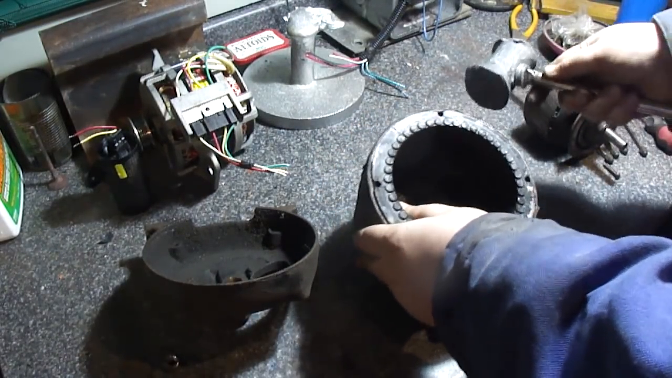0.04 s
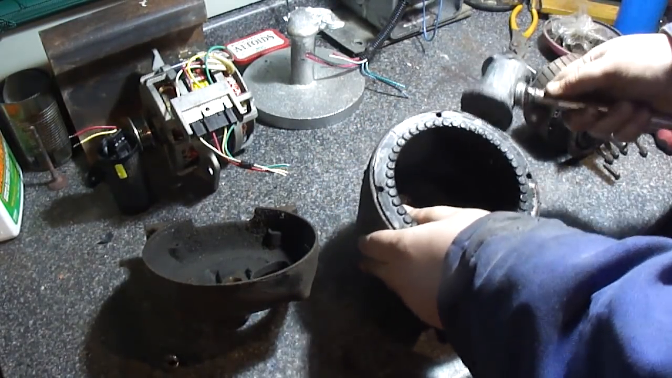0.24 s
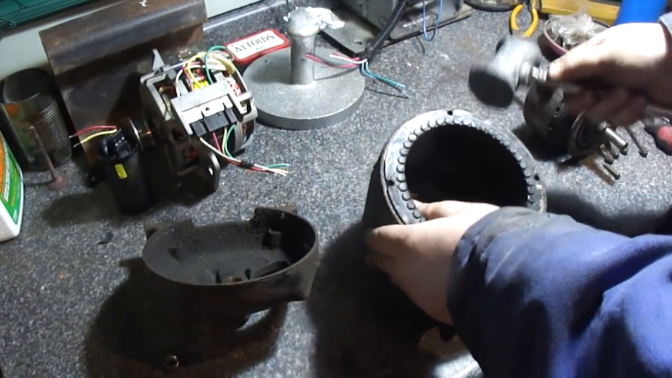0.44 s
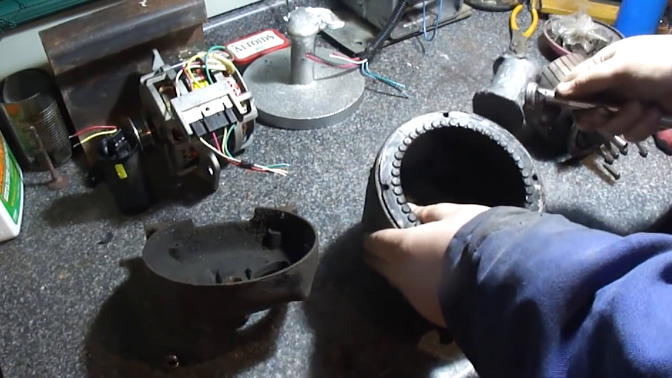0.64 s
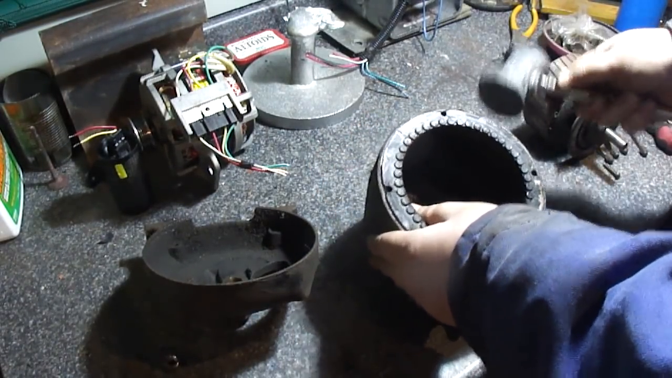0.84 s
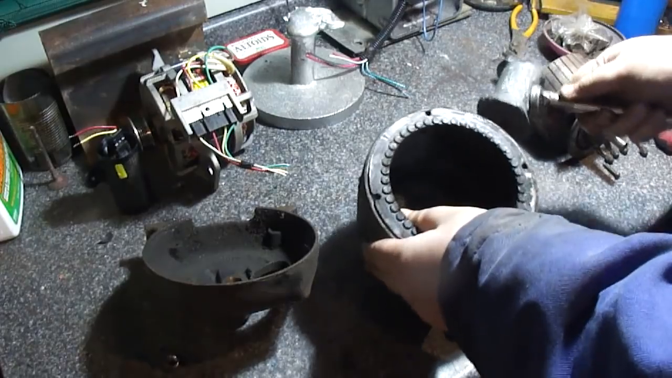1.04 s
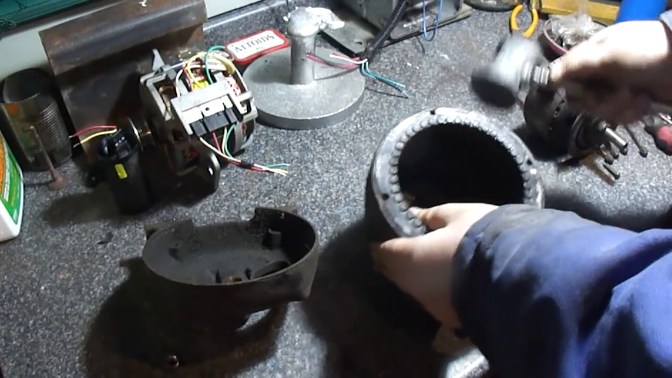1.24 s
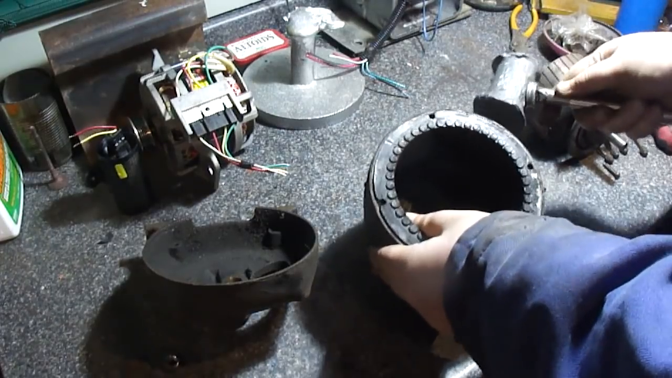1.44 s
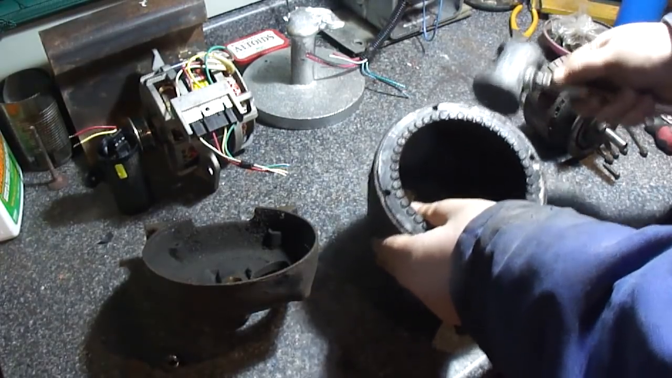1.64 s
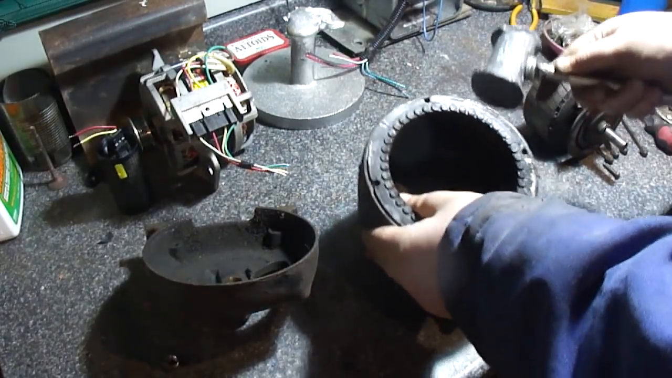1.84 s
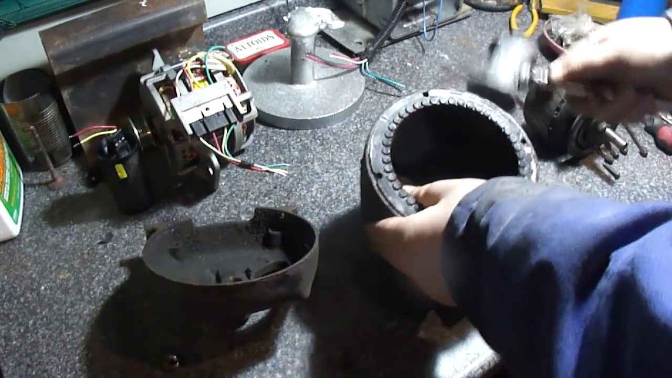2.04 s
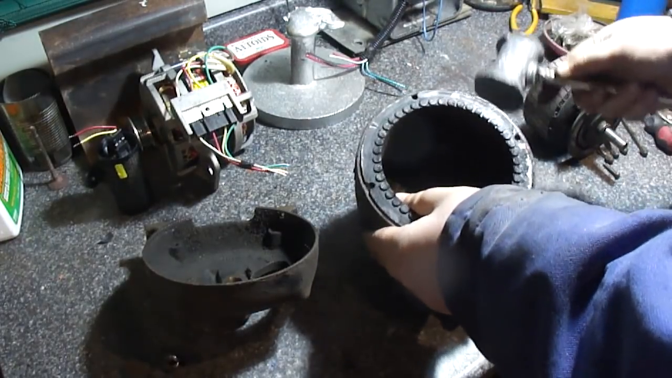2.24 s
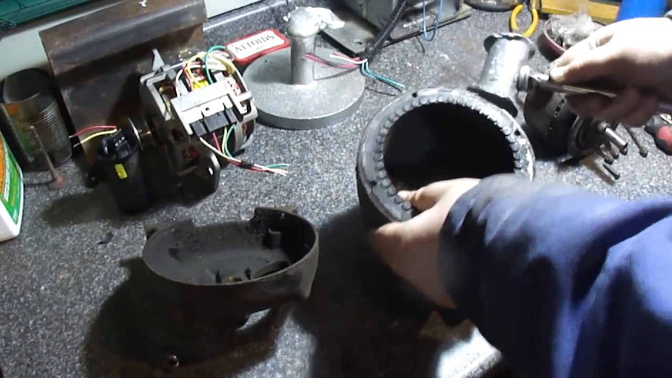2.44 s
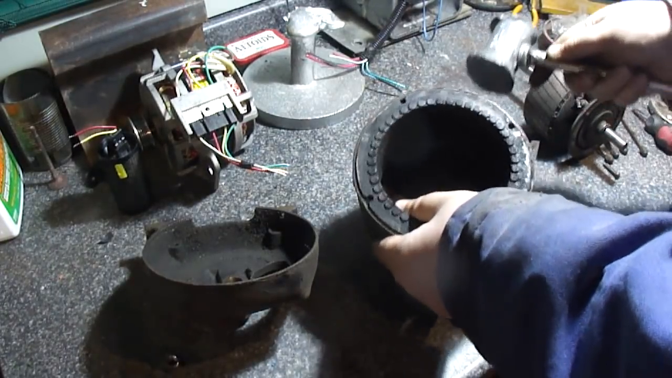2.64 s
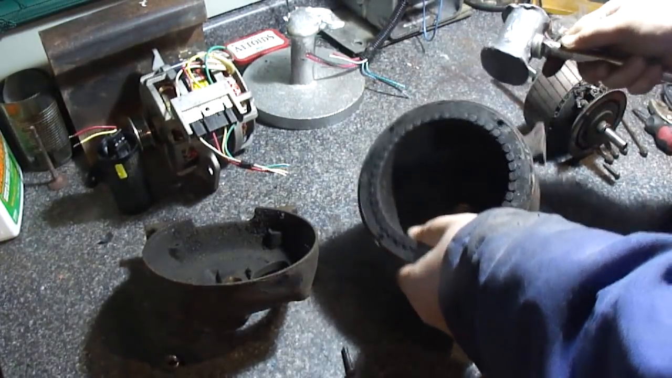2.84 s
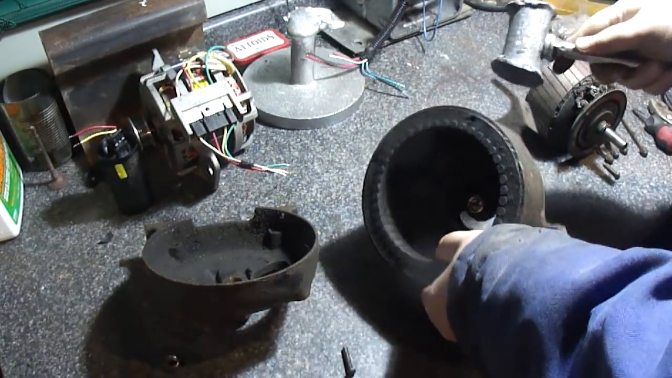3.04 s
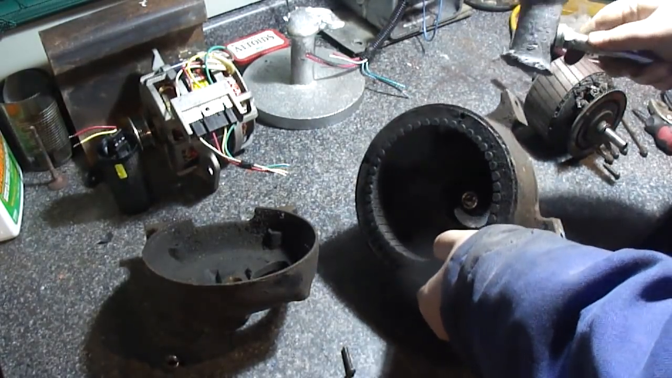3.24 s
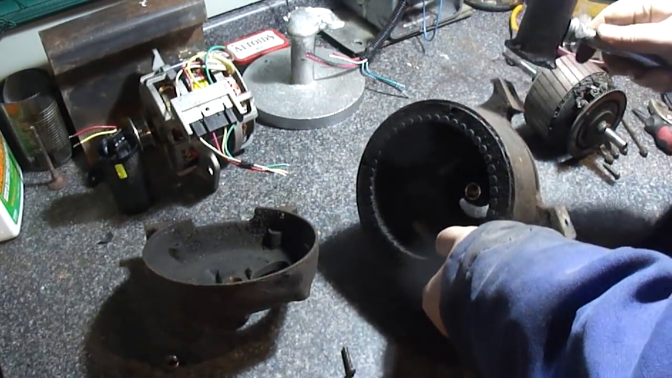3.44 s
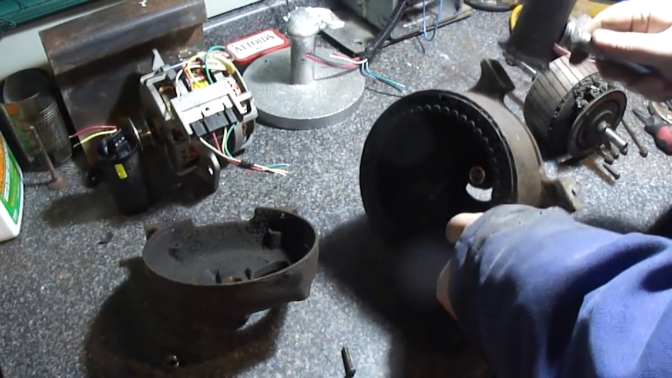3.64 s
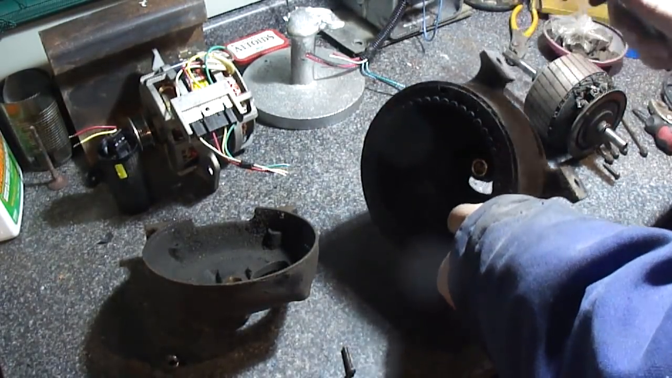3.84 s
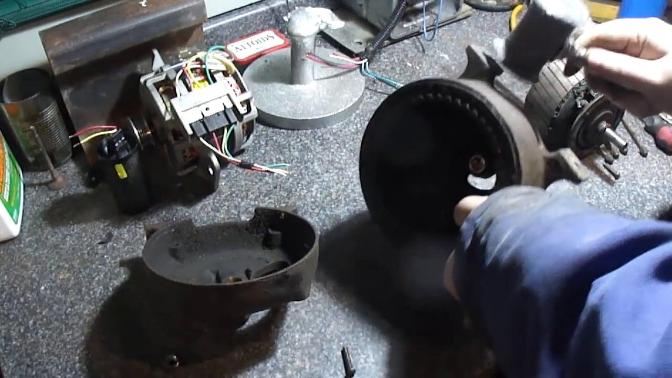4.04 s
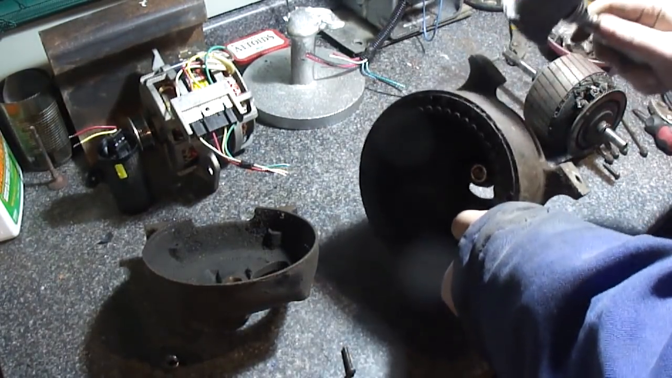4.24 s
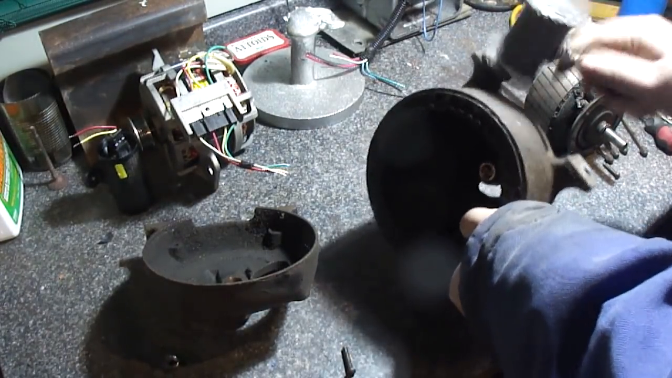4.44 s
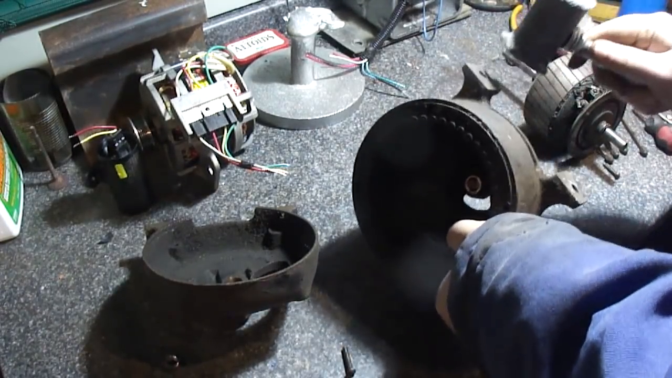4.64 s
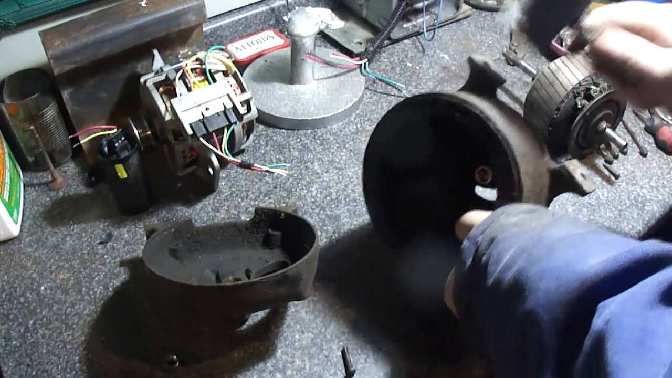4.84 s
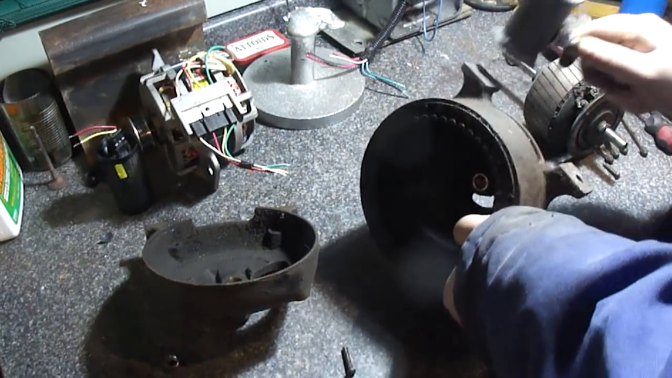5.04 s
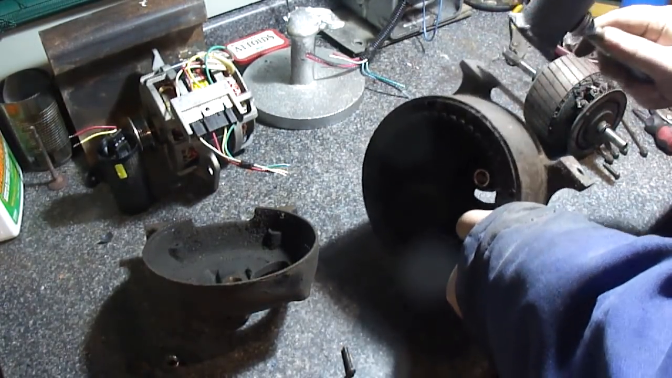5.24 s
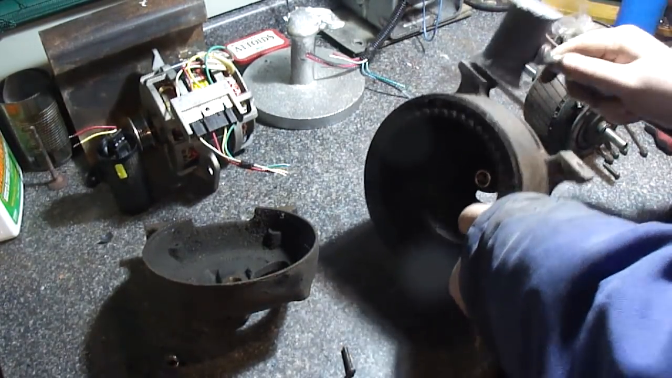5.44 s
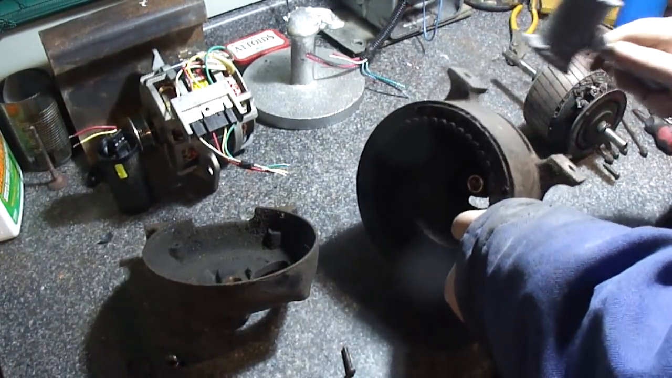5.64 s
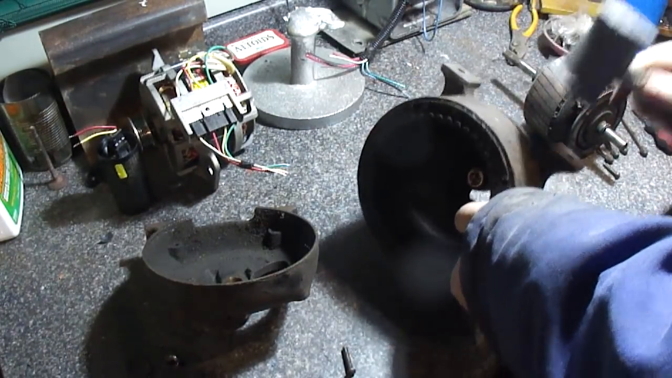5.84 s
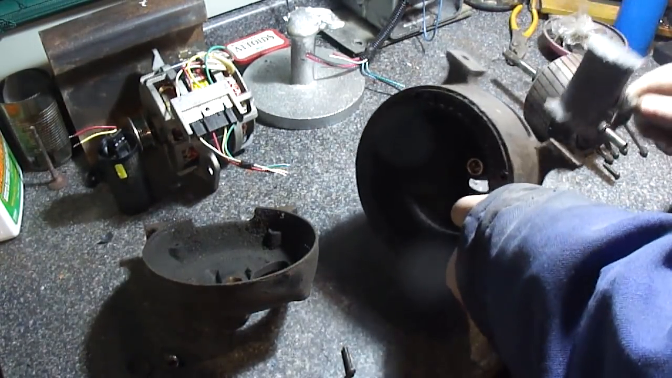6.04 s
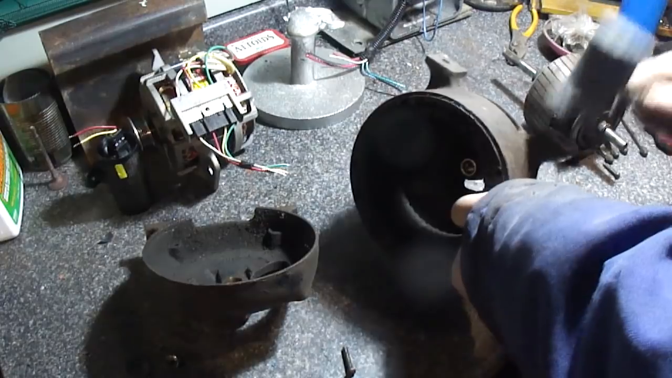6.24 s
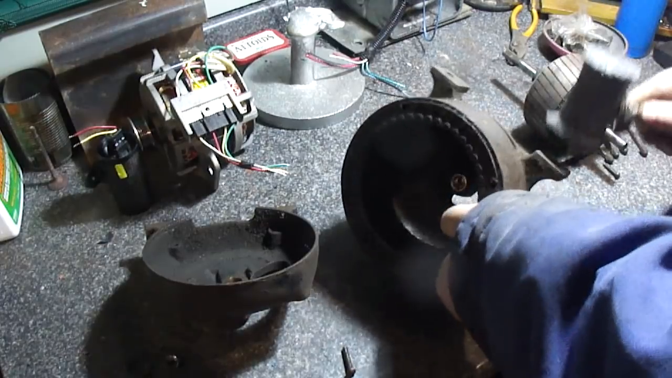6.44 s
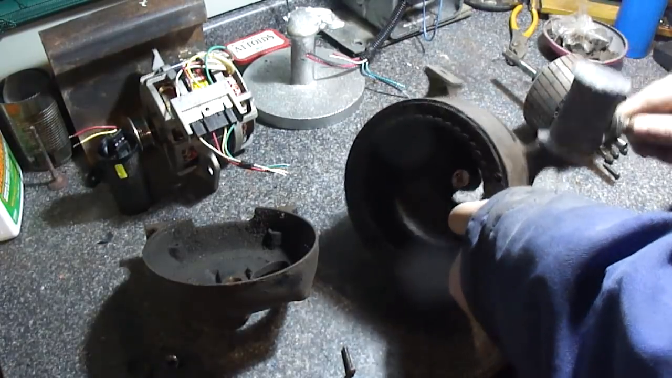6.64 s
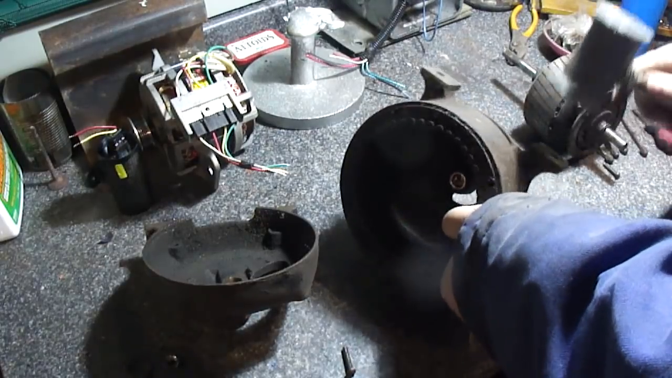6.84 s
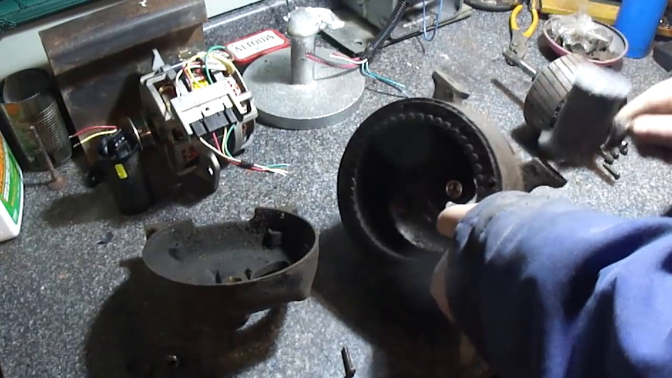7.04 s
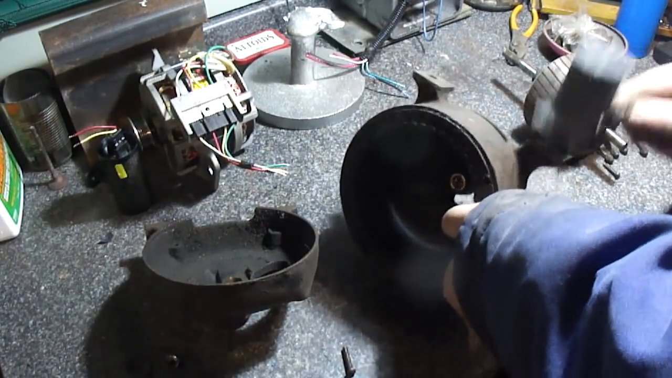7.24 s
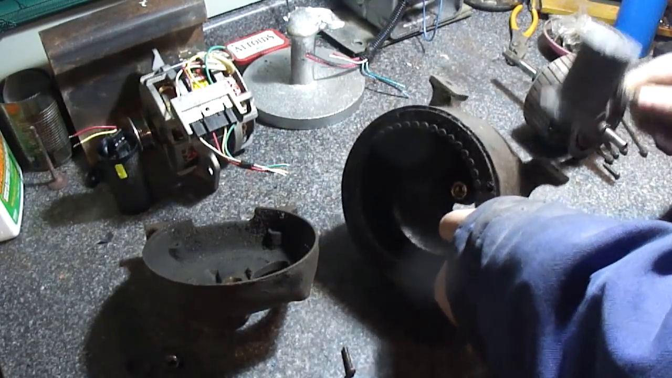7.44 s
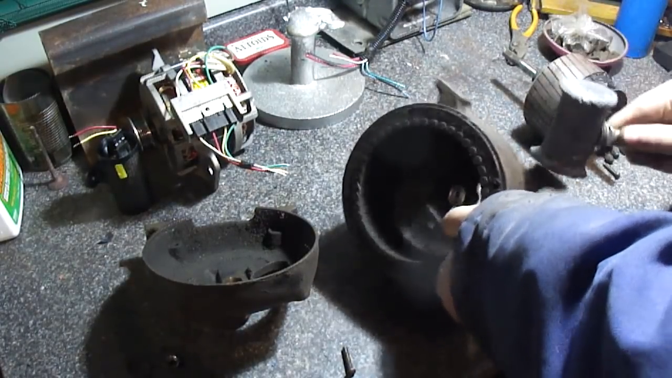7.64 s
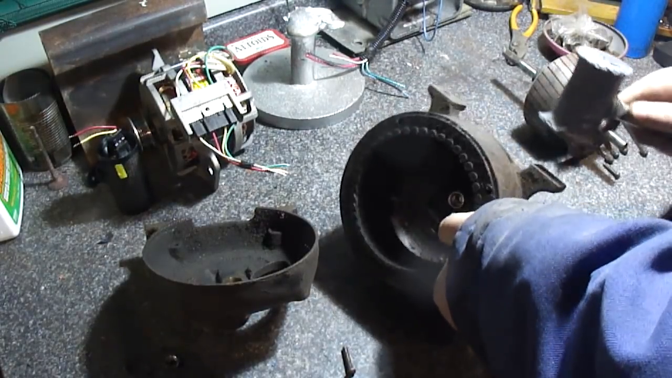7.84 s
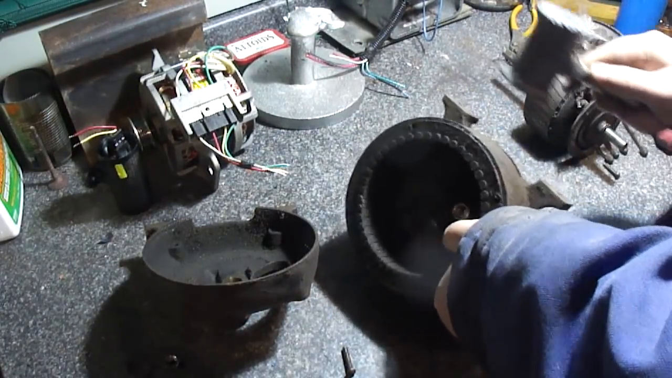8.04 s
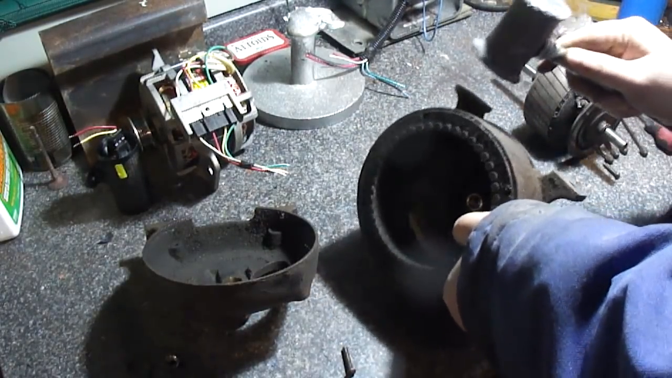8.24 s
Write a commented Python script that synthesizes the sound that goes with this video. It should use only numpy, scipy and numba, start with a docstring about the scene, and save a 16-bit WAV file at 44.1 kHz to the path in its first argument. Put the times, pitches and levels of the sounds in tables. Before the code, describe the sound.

Loud, evenly paced mallet blows ring briefly off a metal housing in a hard-walled workshop. The hammering stops for a moment as the housing clunks lightly on the bench, then resumes with drier knocks that turn brighter and a little faster, ending with a faint clunk. Every strike overloads the microphone, so the soft room noise dips and swells back between hits.

```python
"""A mallet knocks on a cast motor housing held on a workbench: a run of blows on the rim, then, once the
housing is tipped over, five on its flank and five near a foot. Each impact excites the damped modes of
the casting, and a hard-walled workshop reverberates. Between blows the housing settles on the bench, over
soft room noise. Every blow overloads the microphone; its limiter ducks and lets the room swell back."""
import sys
import numpy as np
from scipy import signal
from scipy.fft import rfft, irfft, next_fast_len
from scipy.io import wavfile
from scipy.ndimage import uniform_filter1d, minimum_filter1d
from numba import njit

SR = 44100
rng = np.random.default_rng(int(sys.argv[2]) if len(sys.argv) > 2 else 0)


def inscribe(sig):
    """Save sig as 16-bit PCM at rate SR to the path in sys.argv[1].

    A 1-D sig is mono; a 2-D sig holds one channel per row.
    Samples are clipped to [-1, 1] before scaling.
    """
    pcm = np.round(np.clip(np.atleast_2d(sig).T, -1, 1) * 32767)
    wavfile.write(sys.argv[1], SR, pcm.astype(np.int16))


N = 366471
SIZE = 32768  # samples in one impulse response
HZ = np.fft.rfftfreq(SIZE, 1 / SR)
AGE = np.arange(SIZE) / SR
RIM, FLANK, FOOT = range(3)

# The mallet blows. Each row: start in seconds, force in dB, spot, contact hardness (higher is brighter),
# boost of the main ring in dB, frequency of the local ping in Hz.
BLOWS = [ (-.19, -7, RIM, -3, 4.5, 4640), (.1999, 0, RIM, -0.5, 1, 4430), (.5481, 2, RIM, 7, 1.5, 4380),
         (0.9399, 1.5, RIM, 6.5, 3, 4280), (1.3362, 2, RIM, 20.5, 7, 3380),
         (1.7347, 1.5, RIM, 25, 5.5, 5170), (2.115, -5.5, RIM, 5, 5, 3550),
         (2.4746, -2, RIM, 16, 6.5, 3800), (4.0288, .5, FLANK, -3.5, -3.5, 5200),
         (4.507, 2, FLANK, -2.5, 4, 5830), (4.9465, 2.5, FLANK, -2, 3.5, 6550),
         (5.4057, -0.5, FLANK, -5, 0, 5170), (5.9594, -1.5, FLANK, -0.5, 3, 3410),
         (6.3343, -4.5, FOOT, 3.5, -1, 3080), (6.6854, -4.5, FOOT, 0.5, -4, 3600),
         (7.0101, -1.5, FOOT, 0, 9, 7350), (7.3287, -5.5, FOOT, -2, 4.5, 3770),
         (7.646, -2, FOOT, 1.5, 8.5, 3320)]
# How firmly the hand presses the housing on the bench. Each row: time in seconds, thud passed on in dB.
HAND_PRESSURE = [(.55, 7), (1.336, 2.5), (1.735, -30), (2.47, -21), (4.51, 13), (5.41, -11.5), (5.96, 1)]
def hammering(rebound_s=0.0045, rebound_db=11.5, rebound_hz=1280):
    """Impact and rebound: pressed down upright, the housing bounces off the bench just after a blow."""
    mix, walls = np.zeros((2, N)), room_tail()
    for start, force_db, spot, hardness, ring_db, ping_hz in BLOWS:
        thud_db = np.interp(start, *np.transpose(HAND_PRESSURE))
        add(mix, start, amp(force_db) * blow(walls, spot, thud_db, hardness, ring_db, ping_hz))
        if spot == RIM:
            add(mix, start + rebound_s, knock(force_db + thud_db + rebound_db, rebound_hz)[None])
    return mix


# The strike on rim, flank and foot. Each row: knock level in dB, knock frequency in Hz, ping level in dB.
SPOT_STRIKE = [(14, 850, 8), (20, 930, 7.5), (10.5, 1250, 6)]
# The answer of rim, flank and foot. Each row: crack level in dB, reverberation level in dB.
SPOT_ANSWER = [(-17, 12), (-5.5, 9.5), (1.5, 9.5)]
def blow(walls, spot, thud_db, hardness, ring_db, ping_hz):
    """Superposition: one impact is the sum of the reverberant casting, a knock and a crack."""
    knock_db, knock_hz, ping_db = SPOT_STRIKE[spot]
    crack_db, room_db = SPOT_ANSWER[spot]
    ring = housing(spot, thud_db, hardness, ring_db, ping_hz, ping_db)
    tail = .5 * walls + .87 * room_tail()  # the walls stay put, while housing and arm move between blows
    sound = in_room(ring, room_db, tail) + knock(knock_db, knock_hz) + crack(crack_db + hardness / 2)
    if spot == RIM:  # upright, the housing stands square on the bench
        sound += amp(thud_db) * bench()
    return sound


# The dense, quickly damped response of housing and mallet.
# Each row: frequency in Hz, then level in dB on the rim, on the flank and at the foot.
BODY_RESPONSE = [(94, -12, -105, -39.5), (135, 1.5, -51, -67), (177, -7, -51, -36.5),
                 (257, 13.5, -41.5, -35.5), (480.0, 14.5, -22.5, -17), (750.0, 12, -10.5, -12),
                 (920, 11, -5.0, -1.5), (1210, 8.5, 1.5, 0), (2120, 4.5, -4, -3), (3010, -6, -7.5, -7.5),
                 (4940, -19, -12, -11), (6100, -29, -17.5, -16), (8610, -36.5, -25, -21),
                 (10600, -51, -43.5, -43.5)]
# The modes of the casting that stand out of that response.
# Each row: frequency in Hz, bandwidth in Hz, then level in dB on the rim, on the flank and at the foot.
CASTING_MODES = [ (718, 55, -8, 9, 12), (1095, 50, 3, -2, 6), (1220, 55, -4, -1, 7), (1410, 45, 8, -1, -2),
                 (1633, 45, 23, 11, 3), (1790, 50, -7, -1, -2), (2572, 70, -2, 11.5, 9),
                 (3445, 120, 1, 1, 8.5), (4420, 200, 5, -6, -1)]
def housing(spot, thud_db, hardness, ring_db, ping_hz, ping_db, ping_width_hz=170):
    """Modal response: the point of impact weights the modes, and a harder contact excites more treble."""
    modes = np.array(CASTING_MODES)
    main_ring = modes[:, 2] == modes[:, 2].max()  # the rim's strongest mode
    levels_db = modes[:, 2 + spot] + ring_db * main_ring
    ringing = sum(resonance(hz, width, db) for (hz, width), db in zip(modes[:, :2], levels_db))
    ringing += resonance(ping_hz, ping_width_hz, ping_db)
    colour = curve(BODY_RESPONSE, HZ, column=1 + spot) + 10 * np.log10(1 + ringing)
    colour += thud_db * curve([(250, 1), (1100, 0.28)], HZ)
    colour += hardness * curve([(1700, 0), (7000, 0.79)], HZ)
    colour += curve([(20, -32.5), (90, 2.5)], HZ)  # a small body radiates little deep bass
    return minimum_phase(colour)


def resonance(hz, width_hz, db):
    """A damped mode has a Lorentzian power response."""
    return amp(db) ** 2 / (1 + (2 * (HZ - hz) / width_hz) ** 2)


def knock(level_db, hz, t60=.011, low_cut_hz=250):
    """Sudden deceleration: a body stops dead and radiates a few strong cycles."""
    cycles = amp(level_db - 60 * AGE / t60) * np.sin(2 * np.pi * hz * AGE)
    return signal.lfilter(*signal.butter(1, low_cut_hz, "high", fs=SR), cycles)


def crack(level_db, band_hz=(2200, 5200), t60=0.074):
    """Contact noise: the faces rattle against each other for a moment."""
    rattle = signal.lfilter(*signal.butter(2, band_hz, "band", fs=SR), chatter(t60))
    return amp(level_db) * unit(rattle) * np.sqrt(.03 * SR)  # the energy of 30 ms at rms 1


# The modes of the bench top. Each row: frequency in Hz, level in dB, time to decay by 60 dB in seconds.
BENCH_MODES = [(123, -17.5, 0.15), (269.7, 1.5, 0.17), (301.5, -11, 0.3), (480, -22, 0.13)]
def bench():
    """Structure-borne sound: the blow passes through the housing and the bench top vibrates freely."""
    return sum(amp(db - 60 * AGE / t60) * np.sin(2 * np.pi * hz * AGE) for hz, db, t60 in BENCH_MODES)


# The housing comes down on the bench.
# Each row: start in seconds, clunk level in dB, clunk frequency in Hz, thump level in dB.
LANDINGS = [(0.121, -35, 484, -47), (0.456, -33.5, 457, -41), (0.904, -36, 480, -44),
            (3.108, -22.5, 380, -29), (8.048, -33, 420, -48.5)]
def handling(thump_lag_s=.005, graze_s=3.8805):
    """Weak impacts: each landing gives a hollow clunk, a dry tick and then a thump of the bench top."""
    mix = np.zeros((2, N))
    for start, clunk_db, clunk_hz, thump_db in LANDINGS:
        add(mix, start, touch(clunk_db, clunk_hz, octaves=0.32, t60=0.044, room_db=-8.5))
        add(mix, start, touch(level_db=-35, hz=600, octaves=1.0, t60=.045, room_db=1))
        add(mix, start + thump_lag_s, touch(thump_db, hz=155, octaves=0.95, t60=.12, room_db=-5))
    # the mallet grazes the flank while taking aim
    add(mix, graze_s, touch(level_db=-33, hz=3060, octaves=1.0, t60=.035, room_db=-12))
    return mix


def touch(level_db, hz, octaves, t60, room_db):
    """Band-limited excitation: a light contact stirs one broad region of the spectrum."""
    colour = -8 * abs(np.log2((HZ + 1) / hz) / octaves) ** 1.5
    burst = irfft(rfft(minimum_phase(colour)) * rfft(chatter(t60)))
    return amp(level_db) * in_room(burst, room_db, room_tail())


def chatter(t60):
    """Modal overlap: many damped vibrations at once merge into decaying noise."""
    return unit(rng.standard_normal(SIZE) * amp(-60 * AGE / t60))


# The decay of the workshop. Each row: frequency in Hz, reverberation time in seconds.
REVERB_TIMES = [(100, 0.61), (300, 0.31), (700, 0.44), (1600, 0.45), (3000, 0.42), (6000, 0.36),
                (10000, 0.36)]
def room_tail(build_s=0.0019):
    """Diffuse reverberation: the spectrum of dense reflections that build up and die band by band."""
    hz, t, bands = signal.stft(rng.standard_normal(SIZE), SR, nperseg=256)
    decay = amp(-60 * t / curve(REVERB_TIMES, hz)[:, None])
    tail = signal.istft(bands * decay, SR, nperseg=256)[1][:SIZE]
    return rfft(unit(tail * (1 - np.exp(-AGE / build_s))))


def in_room(sound, room_db, tail):
    """Convolution with the room's response adds the reverberant field to the direct sound."""
    direct = rfft(unit(sound)) * np.sqrt(.03 * SR)  # the energy of 30 ms at rms 1
    return stereo(mid=direct * (1 + amp(room_db) * tail), side=direct * amp(room_db) * room_tail())


# The width of the sound field. Each row: frequency in Hz, gain of the side signal in dB.
SIDE_GAIN = [(3500, -75.5), (4600, -23.5), (6000, -3.5), (9000, -1)]
def stereo(mid, side):
    """Sum and difference of two spectra give left and right; only the treble has any width."""
    side = side * amp(curve(SIDE_GAIN, np.linspace(0, SR / 2, len(side))))
    return irfft(np.array([mid + side, mid - side]))


# The steady noise of the workshop. Each row: frequency in Hz, relative spectral density in dB.
NOISE_SPECTRUM = [(15, -58), (25, -37.5), (143, -12.5), (189, -12), (231, -6), (329, -8), (374, -6.5),
                  (506, -6), (758, -8), (882, -5.5), (5870, -22.5), (10500, -41), (13600, -69.5),
                  (22000, -120)]
def background(level_db=-47.5):
    """Ambient noise: a soft, continuous spectrum whose level wavers a little."""
    size = 2 * next_fast_len(N // 2 + 1)
    colour = amp(curve(NOISE_SPECTRUM, np.fft.rfftfreq(size, 1 / SR)))
    mid, side = rfft(rng.standard_normal((2, size))) * colour
    noise = stereo(mid, side)[:, :N]
    waver_db = .6 * np.interp(np.arange(N), np.linspace(0, N, 120), rng.standard_normal(120))
    return amp(level_db + waver_db) * noise / noise.std()


def amp(db):
    """Decibels to amplitude ratio."""
    return 10 ** (np.asarray(db) / 20)


def curve(points, hz, column=1):
    """Linear interpolation of one column over log frequency."""
    table = np.asarray(points, float)
    return np.interp(np.log(hz + 1), np.log(table[:, 0]), table[:, column])


def unit(x):
    """Normalisation to energy 1."""
    return x / np.sqrt(np.sum(x ** 2) + 1e-20)


def add(mix, start_s, sound):
    """Superposition of a sound on the mix; a negative start cuts off its beginning."""
    start = round(start_s * SR)
    sound = sound[:, max(-start, 0):]
    part = mix[:, max(start, 0):][:, :sound.shape[1]]
    part += sound[:, :part.shape[1]]


def minimum_phase(db):
    """Folding the cepstrum gives the sharpest causal impulse response with this gain over HZ."""
    cepstrum = irfft(np.log(amp(np.maximum(db, db.max() - 100))))
    cepstrum[1:SIZE // 2] *= 2
    cepstrum[SIZE // 2 + 1:] = 0
    return irfft(np.exp(rfft(cepstrum)))


def scene():
    """Sound pressures add: blows and light touches over the background."""
    return background() + hammering() + handling()


@njit
def limiter_gain(level, ceiling, attack, hold, release):
    """Peak limiting: the gain dives, holds after a strong peak, then creeps back (times in samples)."""
    gains = np.ones(len(level))
    goal, gain, wait = 1., 1., 0.
    for i in range(len(level)):
        wait -= 1
        if level[i] * goal > ceiling:
            if level[i] * goal > 2 * ceiling:
                wait = hold
            goal = ceiling / level[i]
        elif wait < 0:
            goal += (1 - goal) / release
        gain += (goal - gain) / attack
        gains[i] = gain
    return gains


def round_off(x, full_scale=.92, samples=7):
    """Fast limiting: a smoothed gain pushes each overshooting crest down to full scale."""
    allowed_gain = full_scale / np.maximum(abs(x).max(0), full_scale)
    return x * uniform_filter1d(minimum_filter1d(allowed_gain, samples), samples)


def low_pass(x, edge_hz=10600):
    """Band limiting: a windowed sinc cuts the top of both channels steeply."""
    taps = signal.firwin(255, edge_hz, window=("kaiser", 8), fs=SR)
    return signal.oaconvolve(x, taps[None], "same")


def record(dry, ceiling=0.54, attack_s=0.00058, hold_s=0.024, release_s=.26, low_cut_hz=70):
    """Overload: the first cycles of a blow outrun the limiter and hit full scale within a limited band."""
    heard = low_pass(dry)
    gain = limiter_gain(abs(heard).max(0), ceiling, attack_s * SR, hold_s * SR, release_s * SR)
    limited = round_off(heard * gain)
    return low_pass(signal.lfilter(*signal.butter(1, low_cut_hz, "high", fs=SR), limited))


dry = scene()
out = record(dry)
inscribe(out)
```